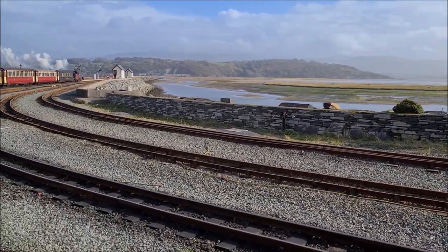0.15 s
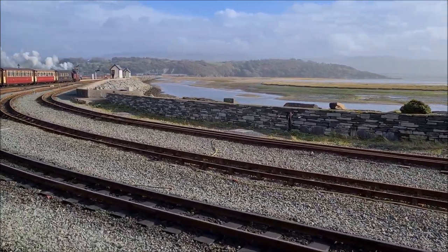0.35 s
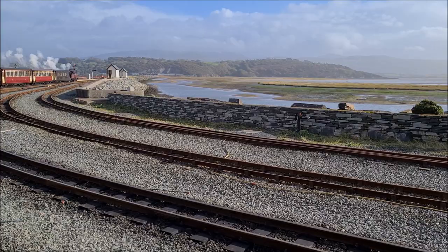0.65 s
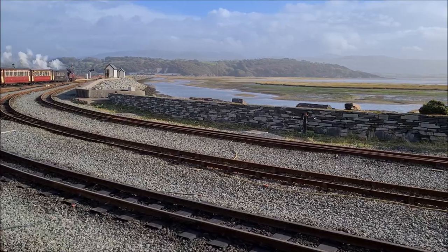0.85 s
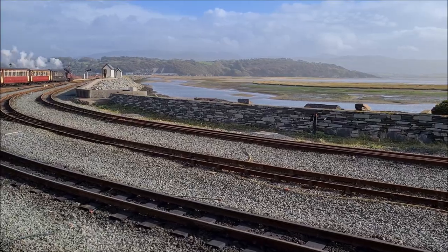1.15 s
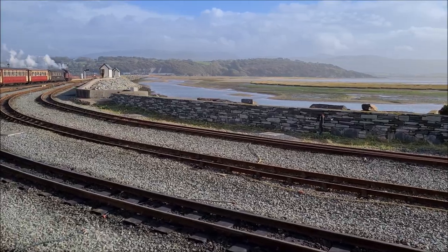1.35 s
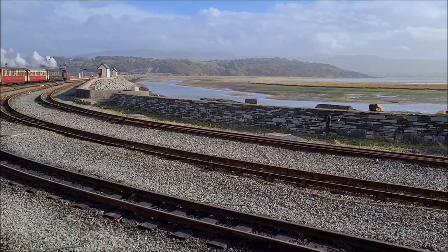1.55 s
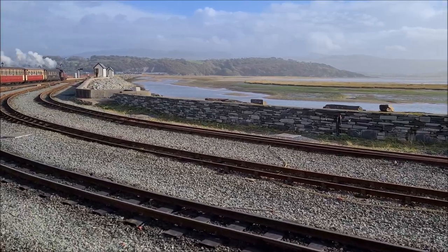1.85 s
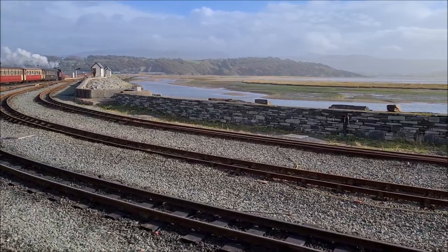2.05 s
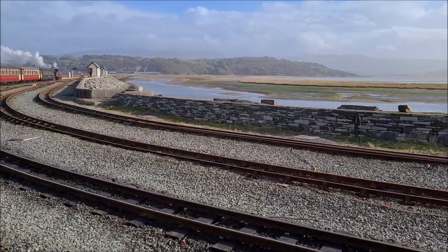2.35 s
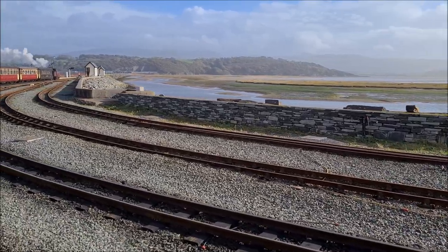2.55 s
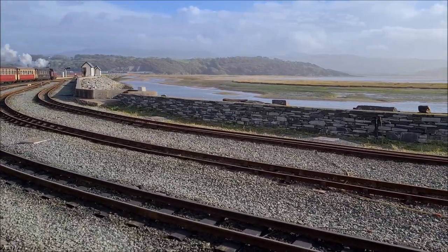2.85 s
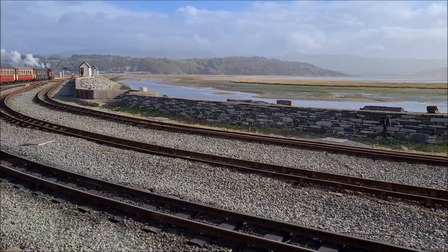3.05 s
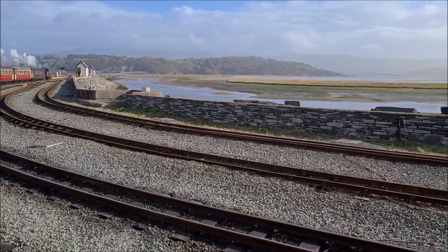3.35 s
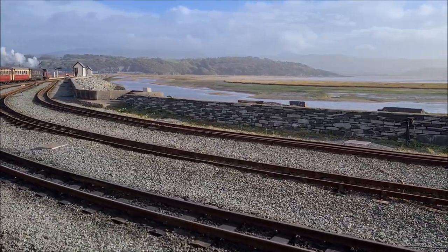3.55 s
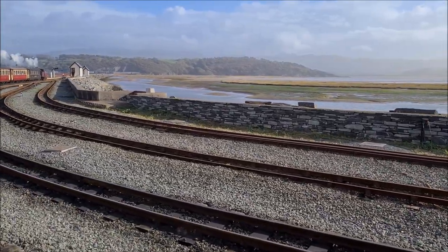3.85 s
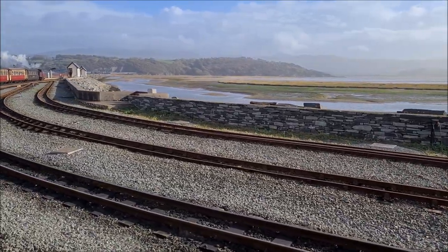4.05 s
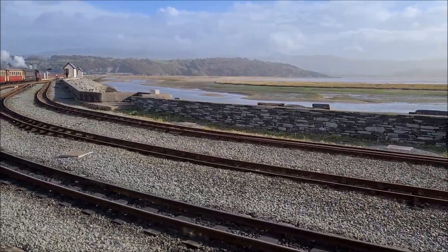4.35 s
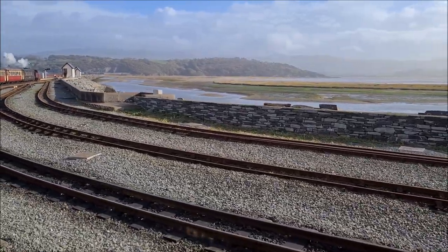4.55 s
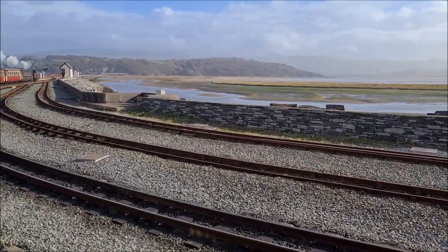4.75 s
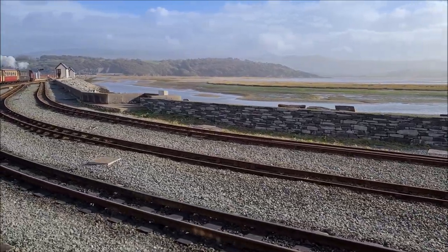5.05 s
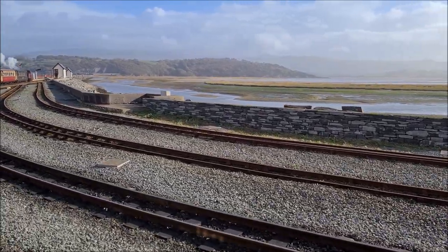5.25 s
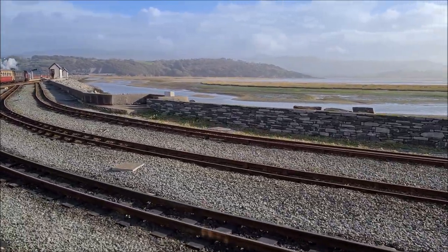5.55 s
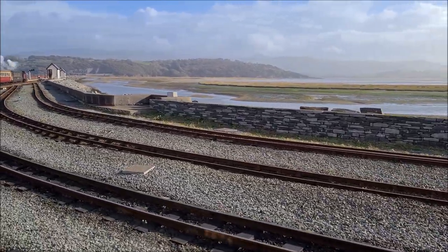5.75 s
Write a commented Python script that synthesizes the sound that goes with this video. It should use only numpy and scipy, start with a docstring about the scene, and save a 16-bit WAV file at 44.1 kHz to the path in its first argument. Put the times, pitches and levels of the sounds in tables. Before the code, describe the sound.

Steel wheels sing a high, fluttering squeal on curved track, beating roughly later on, with gritty scraping and dull carriage rumble underneath.

```python
"""Train wheels squealing on a tight bend

A narrow-gauge train rounds a bend in the open. One wheel sings near 1.1 kHz by stick-slip; a second,
slightly lower wheel joins in bursts and beats with it, and a third rings faintly: all sums of sines.
Flange grinding and rolling hiss are noise shaped by steel resonances, the carriages' rumble is low noise,
and their booms and the knocks of rail joints are swelling or damped sines."""
import sys
import numpy as np
from scipy import signal
from scipy.fft import rfft, irfft, next_fast_len
from scipy.io import wavfile
from scipy.ndimage import uniform_filter1d, minimum_filter1d

SR = 44100
rng = np.random.default_rng(int(sys.argv[2]) if len(sys.argv) > 2 else 0)


def wav_record(signal):
    """Record a signal, one row per channel, as 16-bit PCM in the file named by sys.argv[1]."""
    frames = np.transpose(np.atleast_2d(signal))
    bounded = np.clip(frames, -1, 1)
    # unit amplitude maps onto the largest positive 16-bit level
    quanta = np.round(bounded * 32767).astype(np.int16)
    wavfile.write(sys.argv[1], SR, quanta)


N = 260631

# The singing wheel grips and eases, each grip a swell. Each row: crest in seconds, half length in seconds,
# then the levels of left tone, right tone, octave and twelfth in dB.
SWELLS = [(0.195, 0.0903, -16, -13, -36, -54.5), (0.35, 0.0527, -18.5, -7.5, -26, -41),
          (0.5, 0.061, -14, -7.5, -18, -36), (0.598, 0.095, -11.5, -8.5, -35, -49),
          (0.792, 0.081, -14.5, -13, -38, -51.0), (0.97, 0.0625, -7.5, -7.5, -37.5, -40),
          (1.088, 0.051, -27, -15.5, -41.5, -60), (1.23, 0.05, -23, -20, -47.0, -66),
          (1.346, 0.055, -22, -9.5, -40, -47), (1.472, 0.0972, -17.5, -9, -40, -47.0),
          (1.681, 0.065, -12, -6, -33, -42.0), (1.796, 0.0786, -22, -11, -43, -36),
          (1.924, 0.028, -29, -18.5, -53.0, -52), (2.023, 0.036, -12.5, -12, -46, -40.5),
          (2.133, 0.0543, -16, -4.5, -33, -38), (2.29, 0.053, -19, -10.5, -54, -56),
          (2.383, 0.04, -16.8, -5.5, -53, -51), (2.537, 0.088, -24.5, -13.5, -59, -64),
          (2.737, 0.1098, -9.5, -11.5, -37.0, -43.5), (2.952, 0.057, -20, -12, -61, -61),
          (3.084, 0.05, -16.5, -17, -34.0, -57), (3.204, 0.098, -26, -22.5, -54, -71),
          (3.408, 0.0722, -14.5, -13, -42.5, -49.5), (3.569, 0.067, -16.5, -8.5, -37, -50),
          (3.715, 0.065, -12, -10, -39, -42), (3.854, 0.045, -20.5, -13, -45, -54),
          (3.949, 0.047, -18, -7.5, -32.5, -55), (4.107, 0.095, -21, -12, -31, -37),
          (4.293, 0.099, -22.5, -10.0, -36, -41.5), (4.416, 0.017, -38, -13, -33, -52.0),
          (4.54, 0.092, -13.5, -8, -38, -48.5), (4.704, 0.057, -23, -10.0, -37, -50),
          (4.796, 0.081, -11.5, -11, -35.5, -52), (4.906, 0.088, -28.5, -19.5, -39.5, -50.5),
          (5.158, 0.123, -15.6, -8, -34.0, -42), (5.317, 0.034, -19, -13, -46, -48),
          (5.474, 0.13, -15, -10, -33, -45), (5.673, 0.052, -44, -20, -43, -50),
          (5.787, 0.075, -9, -23, -27, -47), (5.88, 0.045, -18.5, -6, -27.5, -46)]
# Murmur of the singing wheel between swells: left, right, octave and twelfth in dB.
RESTING_DB = (-39.5, -27, -56, -66.5)
# Upper partials of the singing wheel. Each row: multiple of the pitch, level in dB when the tone is at 0 dB.
UPPER_PARTIALS = [(4, -44), (5, -53), (6, -52.5)]
# Shifting paths to the two microphones. Each row: time in seconds, lead of the left side in ms.
LEAD = [(0.0, 0.5), (0.166, 0.88), (0.309, 1.36), (0.462, 1.11), (0.579, 1.83), (0.743, 1.5), (0.863, 1.69),
        (0.957, 2.57), (1.246, 2.73), (1.425, 3.44), (1.553, 2.88), (1.748, 3.35), (2.05, 3.44),
        (2.108, 3.15), (2.306, 3.38), (2.951, 3.23), (3.02, 3.76), (3.1, 3.3), (3.633, 3.47), (3.878, 3.2),
        (4.005, 4.24), (4.14, 3.95), (4.469, 5.07), (5.615, 5.1), (5.813, 4.53), (5.861, 4.04)]
# Cries of the joining wheel. Each row: crest in seconds, half length in seconds, left, right and octave
# in dB, pitch in Hz, time from the crest to the quiet moment of the beat in ms on the left, and on the right.
CRIES = [(2.657, 0.083, -12, -22, -32.5, 1095, 17, -49), (2.776, 0.06, -14.5, -15.5, -39.5, 1093, 18, 18),
         (3.01, 0.031, -2.5, -6.5, -30, 1096, 33.5, 23.5), (3.091, 0.026, -17.5, -30, -41, 1090, 56, 29),
         (3.449, 0.042, -10, -19, -34.5, 1101.6, -8.5, 26.5),
         (3.49, 0.035, -12.5, -17.5, -41, 1093, 26.5, 2), (3.634, 0.036, -28, -16.5, -41.5, 1091, -5, -3),
         (3.75, 0.068, -8.5, -11.5, -36.5, 1094, -45, 5.5), (3.839, 0.095, -18, -24, -46, 1099, 8.0, -43),
         (3.994, 0.055, -12, -9, -39.5, 1101, 0.5, 14.5), (4.058, 0.042, -13.5, -20, -39, 1099.5, 50.5, 25),
         (4.157, 0.034, -21, -16, -31, 1091, 15.5, 24), (4.292, 0.12, -22.6, -22, -41, 1106, 1, 0),
         (5.105, 0.15, -25.5, -31, -39, 1103, -60.5, 21),
         (5.411, 0.043, -8, -8.6, -27.5, 1100, 13.5, -17.0),
         (5.518, 0.089, -8.5, -10, -36.5, 1099, -13, 10.5), (5.659, 0.05, -10.5, -14, -38, 1099, -2, 13),
         (5.773, 0.049, -10.5, -9.5, -24, 1105, 23, 17.5), (5.874, 0.089, -13, -13, -31.5, 1104, -51, -4.5)]
# The faint, higher wheel pipes up. Each row: crest in seconds, tone and octave in dB before the mix offsets.
PIPES = [(.25, -39.5, -29.5), (.52, -29, -43.5), (.95, -17.5, -52), (1.58, -26, -37.5),
         (1.74, -21.5, -51.5), (2.37, -40.5, -41.5), (2.48, -30.5, -55), (2.62, -28, -46),
         (3.72, -35, -43.5), (3.92, -28.5, -44), (4.91, -22, -38.5), (5.18, -33.5, -48.5), (5.83, -40, -41)]
# The flange grinds on the rail. Each row: start in seconds, hold in seconds, level at 8-15 kHz in dB.
GRINDS = [(0.483, .03, -56), (0.9, 0.038, -52.5), (1.398, 0.017, -60.5), (1.747, 0.031, -58),
          (2.621, 0.12, -47), (2.966, 0.085, -46.5), (3.375, .02, -51), (3.415, 0.019, -45),
          (3.46, 0.09, -54), (3.624, 0.14, -44), (3.874, .13, -54), (4.039, 0.053, -41),
          (4.12, 0.02, -49.5), (4.732, .02, -53.5), (5.032, 0.04, -55), (5.378, 0.033, -48),
          (5.447, 0.27, -50), (5.653, 0.11, -47), (5.795, 0.11, -50)]
# Rail joints. Each row: start in seconds, level before the onset and decay in dB, pitch in Hz.
JOINTS = [(0.299, -14.5, 377), (0.53, -23, 872), (0.943, -20, 307), (1.199, -16.5, 275), (2.119, -5.5, 337),
          (2.832, -17, 284), (3.345, -9.5, 267), (4.277, -33.5, 326), (5.307, -24, 269.5),
          (5.518, -20, 920)]
# Booms of the carriage bodies. Each row: crest in seconds, peak in dB, pitch in Hz,
# time from the crest to 1/e in seconds.
BOOMS = [(0.373, -21.5, 53.46, 0.041), (0.78, -26, 155.6, 0.09), (0.897, -28, 82, 0.15),
         (2.049, -18.5, 78.4, 0.034), (2.26, -26.5, 84, 0.23), (2.637, -21, 205, 0.031),
         (2.978, -26.5, 203, 0.024), (3.117, -21.5, 206.4, 0.018), (3.208, -27.5, 205.7, 0.023),
         (4.064, -16.5, 75, 0.028), (4.821, -20, 46.4, 0.037)]
# Carriage levels over time. Each row: time in seconds, deep rumble, body drone and roar in dB.
RUMBLE = [(0.0, -30.5, -34, -38.5), (0.29, -27.5, -34.5, -36.5), (0.77, -29.5, -32, -40),
          (0.94, -23, -33.5, -35), (0.98, -27, -36, -37), (2.61, -28, -31.5, -37.5),
          (2.94, -31, -34, -41.5), (3.59, -29.5, -36, -41.5), (3.97, -34, -36, -38.5),
          (4.05, -26.5, -34, -40), (4.36, -32.5, -32, -37.5), (4.73, -27.5, -33, -37.5),
          (5.83, -29.5, -32, -37.5), (5.86, -30.5, -31.5, -38)]
# Relative noise spectra of five sources. Each row: frequency in Hz, density in dB per Hz.
GRINDING_SPECTRUM = [(1300, -32), (1600, -23), (1850, -4), (2150, -14.5), (2630, -13.5), (3230, -4),
                     (3780, -18), (4360, -8.5), (5100, -16), (5540, -11.5), (7000, -12.5), (9010, -24),
                     (12000, -27), (14000, -26.5), (15400, -36), (16500, -40.5)]
ROLLING_SPECTRUM = [(900, -31.5), (1130, -20), (1300, -21.5), (1620, -41.5), (2200, -31.5), (2910, -42),
                    (3350, -40), (3750, -45.5), (4400, -41.5), (5150, -54), (5700, -41), (7300, -49),
                    (9100, -78), (12200, -68.5), (16500, -67)]
DEEP_SPECTRUM = [(22, -36.5), (32, -1), (50, -3.5), (80, -4.5), (110, -4.5), (160, -32.5)]
DRONE_SPECTRUM = [(90, -14.5), (130, -8.5), (200, -6), (300, -11), (400, -22)]
ROAR_SPECTRUM = [(280, -12.5), (380, -4), (500, -5.5), (800, -0.5), (1000, -4), (1150, -27.5)]
# Resonances of wheel and rail, then of carriage bodies. Each row: centre in Hz, width in Hz, boost in dB.
WHEEL_MODES = [(1075.4, 4.7, 13.5), (1096.8, 5.8, 23), (2400, 150, -3.5), (2224, 150, 7.5), (2715, 26, 9),
               (3404, 230, 5.5), (4013, 130, 5.5), (4530, 66, -1.5), (4380, 100, 4.5), (5250, 75, 3.5),
               (5574, 50, 11.5), (6000, 120, 4.5), (6560, 78, 4.5), (7560, 64, 4), (12200, 1700, 7)]
BODY_MODES = [(54.4, 6.4, 3.9), (79.6, 8.5, 6.5), (214, 2.2, 3.3)]
# Likeness of the two sides. Each row: frequency in Hz, correlation from -1 to 1.
LIKENESS = [(60, 0.9), (180, 0.93), (550, 0.53), (1650, -0.16), (4970, -0.08), (15000, 0.01)]
# Balance of the two sides. Each row: frequency in Hz, left minus right in dB.
LEAN = [(60, -1), (380, 1), (800, -2.5), (1300, -1.5), (4400, -4.5), (5600, -9), (7800, 5.5), (9500, -0.5),
        (12000, -8.5), (14500, -5.5)]

SINGING_HZ, CREEP_HZ_PER_S = 1118, 0.4   # pitch at 0 dB, creeping up
SAG_HZ_PER_DB = 0.35   # flatter when it sings softly
SWELL_RISE, SWELL_FLATNESS = 0.9, 2.2   # rise as a share of the fall; above 2 the top is flatter
CRY_RISE, CRY_FLATNESS = 0.6, 2.1
FLARE_SHARE, FLARE_EARLY_S = 0.93, 0.009   # octave and twelfth: share of swell length, lead on its crest
FAINT_WHEEL_HZ, PIPE_HALF_S = 1194, 0.071
FAINT_REST_DB, FAINT_OCTAVE_REST_DB = -38, -51   # centres of the drifting floors, before the mix offsets
GRIND_ATTACK_S, GRIND_RELEASE_DB_PER_S, GRIND_REST_DB = 0.033, 179, -66
ROLLING_DB, ROLLING_FOLLOWS = -44.5, 0.25   # hiss at 3.6-7.5 kHz with the song at 0 dB; share of its swing
CEILING, CUTOFF_HZ = 1.0, 15450


def singing_course():
    """Amplitude-dependent pitch: the wheel sounds flatter when soft; gives levels, phase and left lead."""
    crest, half, left, right, *_ = np.transpose(SWELLS)
    left = level_of(crest, half, left, SWELL_RISE, SWELL_FLATNESS, rest_db=RESTING_DB[0])
    right = level_of(crest, half, right, SWELL_RISE, SWELL_FLATNESS, rest_db=RESTING_DB[1])
    creep = CREEP_HZ_PER_S * np.arange(N) / SR
    hz = SINGING_HZ + creep + SAG_HZ_PER_DB * np.maximum(right, -30)
    lead_ms, = in_time(LEAD)
    return left, right, turning(hz), 2 * np.pi * hz * lead_ms / 1000


def singing_wheel(left, right, phase, lead):
    """Stick-slip self-oscillation: each grip swells one wheel mode and its overtones."""
    crest, half, _, _, octave, twelfth = np.transpose(SWELLS)
    early, short = crest - FLARE_EARLY_S, FLARE_SHARE * half
    octave = level_of(early, short, octave, SWELL_RISE, SWELL_FLATNESS, rest_db=RESTING_DB[2])
    twelfth = level_of(early, short, twelfth, SWELL_RISE, SWELL_FLATNESS, rest_db=RESTING_DB[3])
    upper = [(k, 2 * right + db) for k, db in UPPER_PARTIALS]   # grow faster than the tone
    return squeal(phase, phase + lead, phase, left, right, [(2, octave), (3, twelfth)] + upper, rough=0.11)


def joining_wheel(singing_phase, lead):
    """Beating: a second stick-slip tone, slightly lower, reinforces and opposes the singing wheel."""
    crest, half, left, right, octave, hz, left_quiet, right_quiet = np.transpose(CRIES)
    left_phase, left = cries(singing_phase + lead, left, left_quiet)
    right_phase, right = cries(singing_phase, right, right_quiet)
    octave = level_of(crest, half, octave, CRY_RISE, CRY_FLATNESS)
    overtones = [(2.004, octave), (3, octave - 9), (5, octave - 18)]
    # the overtones glide smoothly from one cry's pitch to the next
    gliding_hz = uniform_filter1d(np.interp(np.arange(N) / SR, crest, hz), size=SR // 12)
    return squeal(turning(gliding_hz), left_phase, right_phase, left, right, overtones, rough=0.04)


def faint_wheel():
    """Stick-slip in a higher mode: a wavering tone pipes up from a drifting floor."""
    crest, level, octave = np.transpose(PIPES)
    half = np.full(len(crest), PIPE_HALF_S)
    level = np.maximum(level_of(crest, half, level), FAINT_REST_DB + 5.0 * drift(1.7))
    octave = np.maximum(level_of(crest, half, octave), FAINT_OCTAVE_REST_DB + 2.7 * drift(15.0))
    phase = turning(FAINT_WHEEL_HZ + 3 * drift(8.3))
    left_phase = phase + 3.0 * drift(3.5)
    return squeal(phase, left_phase, phase, level - 6.8, level - 2.0, [(2, octave - 1.4)], rough=0.55)


def wheels():
    """Superposition of three squeals; two share path lengths that shift as the wheels roll."""
    left, right, phase, lead = singing_course()
    out = singing_wheel(left, right, phase, lead)
    out += joining_wheel(phase, lead)
    return out + faint_wheel()


def friction():
    """Resonantly filtered friction noise: bursts of flange grinding over rolling hiss, coloured by steel."""
    t, grinding_db = np.arange(N) / SR, GRIND_REST_DB
    for start, hold, db in GRINDS:
        rising = db - 20 * np.clip(1 - (t - start) / GRIND_ATTACK_S, 0, None)
        falling = db - GRIND_RELEASE_DB_PER_S * (t - start - GRIND_ATTACK_S - hold)
        grinding_db = np.maximum(grinding_db, np.minimum(rising, falling))
    crest, half, _, right, *_ = np.transpose(SWELLS)
    singing_db = level_of(crest, half, right, SWELL_RISE, SWELL_FLATNESS)
    rolling_db = ROLLING_DB + ROLLING_FOLLOWS * np.maximum(singing_db, -30)
    grinding = noise(GRINDING_SPECTRUM, WHEEL_MODES, patchy_db=1.5, flicker_hz=30, unit_band=(8000, 15000))
    rolling = noise(ROLLING_SPECTRUM, WHEEL_MODES, patchy_db=2.33, flicker_hz=8.0, unit_band=(3600, 7500))
    grit_db = 1.2 * drift(250)   # the flange catches unevenly
    return from_db(grinding_db + grit_db) * grinding + from_db(rolling_db) * rolling


def joints():
    """Impulse response of damped modes: each joint is a dull knock, a short ring and a lower thud."""
    out, t = np.zeros(N), np.arange(round(0.15 * SR)) / SR
    for s, db, hz in JOINTS:
        ring = np.sin(2 * np.pi * hz * t) * np.exp(-t / 0.0029)
        thud = 0.18 * np.sin(2 * np.pi * 0.55 * hz * t) * np.exp(-t / 0.027)
        onset = 1 - np.exp(-t / 0.0021)
        at = round(s * SR)
        out[at:at + len(t)] += from_db(db) * onset * (ring + thud)
    return out


def booms():
    """Low body resonance: each boom is one sine under a bell-shaped envelope."""
    t, out = np.arange(N) / SR, np.zeros(N)
    for s, db, hz, length in BOOMS:
        envelope = np.exp(-((t - s) / length) ** 2)
        out += from_db(db) * envelope * np.sin(2 * np.pi * hz * t)
    return out


def carriages():
    """Band-limited random vibration: deep rumble, drone of the bodies and a mid roar."""
    deep_db, drone_db, roar_db = in_time(RUMBLE)
    deep = noise(DEEP_SPECTRUM, BODY_MODES, patchy_db=-0.23, flicker_hz=5.2, unit_band=(30, 110))
    drone = noise(DRONE_SPECTRUM, BODY_MODES, patchy_db=1.5, flicker_hz=11, unit_band=(130, 320))
    roar = noise(ROAR_SPECTRUM, [], patchy_db=2.5, flicker_hz=20, unit_band=(350, 950))
    return from_db(deep_db) * deep + from_db(drone_db) * drone + from_db(roar_db) * roar


def squeal(phase, left_phase, right_phase, left_db, right_db, overtones, rough):
    """Stick-slip squeal: a tone with loosely following overtones, heard on two sides."""
    out = np.array([from_db(left_db) * tone(left_phase, rough, rough_hz=33.6),
                    from_db(right_db) * tone(right_phase, 0.59 * rough, rough_hz=33.3)])
    mean_hz = phase[-1] / (2 * np.pi) * SR / N
    for multiple, db in overtones:
        lean = at_hz(LEAN, multiple * mean_hz) / 2
        for side, sign in enumerate((1, -1)):   # overtones wander in phase separately left and right
            wander = 2.11 * drift(3.78)
            partial = tone(multiple * phase + wander, rough=0.3, rough_hz=22)
            out[side] += from_db(db + sign * lean) * partial
    return out


def tone(phase, rough, rough_hz):
    """Random modulation: uneven stick-slip shivers the height and phase of a sine of nominal rms 1."""
    height = 1 + rough * drift(rough_hz)
    return np.sqrt(2) * height * np.sin(phase + rough * drift(rough_hz))


def cries(singing_phase, levels_db, quiet_ms):
    """Destructive interference: on one side, each cry opposes the singing wheel at its quiet moment."""
    crest, half, *_, hz = np.transpose(CRIES)[:6]
    t, out = np.arange(N) / SR, np.full(N, 1e-5, complex)
    gains = swells(crest, half, levels_db, CRY_RISE, CRY_FLATNESS)
    for gain, pitch, quiet in zip(gains, hz, crest + quiet_ms / 1000):
        gain = filled(gain)
        near = gain > 1e-5
        opposed = np.interp(quiet, t, singing_phase) + np.pi
        phase = opposed + 2 * np.pi * pitch * (t[near] - quiet)
        out[near] += gain[near] * np.exp(1j * phase)
    return np.angle(out), 20 * np.log10(abs(out))


def noise(spectrum, modes, patchy_db, flicker_hz, unit_band):
    """Filtered stereo noise with resonances, set to rms 1 in unit_band; half-octave bands then flicker."""
    size = next_fast_len(N)
    hz = np.maximum(np.fft.rfftfreq(size, 1 / SR), 1)
    lowest, highest = spectrum[0][0], spectrum[-1][0]
    gain = from_db(at_hz(spectrum, hz)) * (hz > lowest) * (hz < highest)
    for centre, width, db in modes:
        gain = gain * (1 + (from_db(db) - 1) / (1 + (2 * (hz - centre) / width) ** 2))
    mid, side = rfft(rng.standard_normal((2, size)))
    alike = np.clip(at_hz(LIKENESS, hz), -1, 1)
    lean = from_db(at_hz(LEAN, hz) * [[0.5], [-0.5]])
    both = gain * lean * (np.sqrt(1 + alike) * mid + np.sqrt(1 - alike) * side * [[1], [-1]])
    inside = (hz > unit_band[0]) & (hz < unit_band[1])
    both = both / np.sqrt(np.mean(irfft(both * inside, size) ** 2))
    half_octave, out, together = 2 * np.log2(hz), 0, drift(flicker_hz)
    for k in range(int(2 * np.log2(lowest)), int(2 * np.log2(highest)) + 2):
        band = irfft(both * np.clip(1 - abs(half_octave - k), 0, 1), size)[:, :N]
        out = out + band * from_db(patchy_db * (0.68 * together + drift(flicker_hz)))
    return out


def drift(rate_hz):
    """Low-passed chance of spread 1: noise at every 40th sample through a double one-pole."""
    r = np.exp(-80 * np.pi * rate_hz / SR)
    slow = signal.lfilter([1], [1, -2 * r, r * r], rng.standard_normal(N // 40 + 2002))[2000:]
    return filled(rms_one(slow))


def swells(crests, halves, levels_db, rise=1.0, flatness=1.4):
    """Bell-shaped envelopes, one row each, as gain at every 40th sample."""
    t = np.arange(0, N + 40, 40) / SR
    away = (t - crests[:, None]) / halves[:, None]
    away = np.where(away < 0, away / rise, away)
    return from_db(levels_db)[:, None] * np.exp(-abs(away) ** flatness)


def level_of(crests, halves, levels_db, *shape, rest_db=-80):
    """Summed amplitudes: level in dB of a run of swells added to a resting level."""
    return 20 * np.log10(filled(sum(swells(crests, halves, levels_db, *shape))) + from_db(rest_db))


def filled(coarse):
    """Linear interpolation from every 40th sample to all samples."""
    return np.interp(np.arange(N) / 40, np.arange(len(coarse)), coarse)


def turning(hz):
    """Phase as the running integral of a pitch curve."""
    return 2 * np.pi * np.cumsum(hz) / SR


def from_db(db):
    """Decibels to amplitude gain."""
    return 10 ** (np.asarray(db) / 20)


def rms_one(x):
    """Normalisation to unit rms."""
    return x / np.sqrt(np.mean(x ** 2) + 1e-20)


def in_time(rows):
    """Linear interpolation of table columns over all samples."""
    s, *columns = np.transpose(rows)
    return [np.interp(np.arange(N) / SR, s, c) for c in columns]


def at_hz(points, hz):
    """Interpolation of a table on a log-frequency axis."""
    table_hz, values = np.array(points).T
    return np.interp(np.log(hz), np.log(table_hz), values)


def scene():
    """Superposition of all sources at two microphones; joints and booms are equal on both sides."""
    return wheels() + friction() + carriages() + booms() + joints()


def record(dry):
    """Peak limiting, then low-pass filtering: gain eases down around loud crests and the top is cut."""
    reach = round(0.004 * SR)
    room = np.minimum(1, CEILING / np.maximum(abs(dry).max(0), 1e-9))
    gain = uniform_filter1d(minimum_filter1d(room, 2 * reach), reach)
    low_pass = signal.ellip(12, 0.5, 70, CUTOFF_HZ, fs=SR, output="sos")
    return signal.sosfilt(low_pass, dry * gain)


dry = scene()
out = record(dry)
wav_record(out)
```